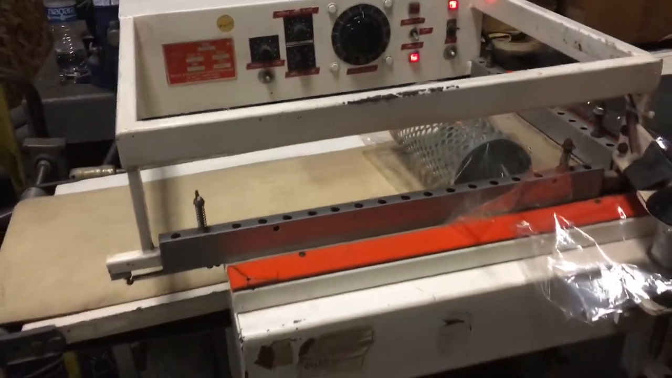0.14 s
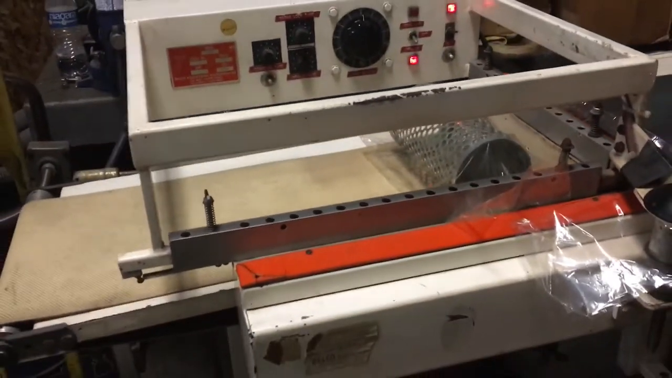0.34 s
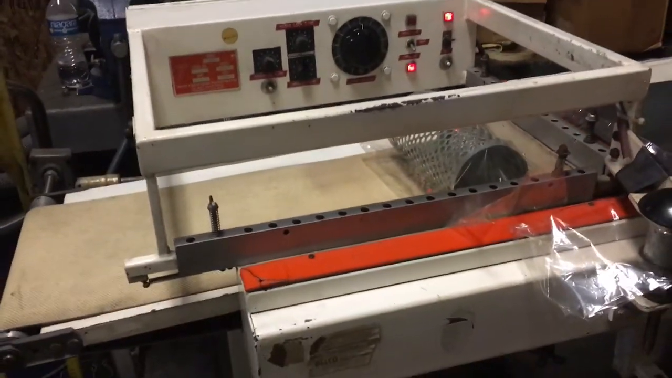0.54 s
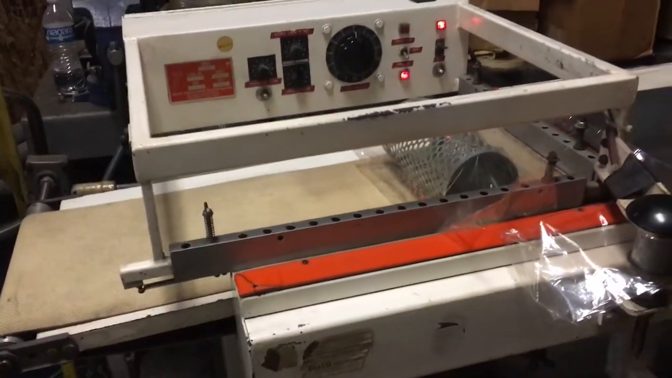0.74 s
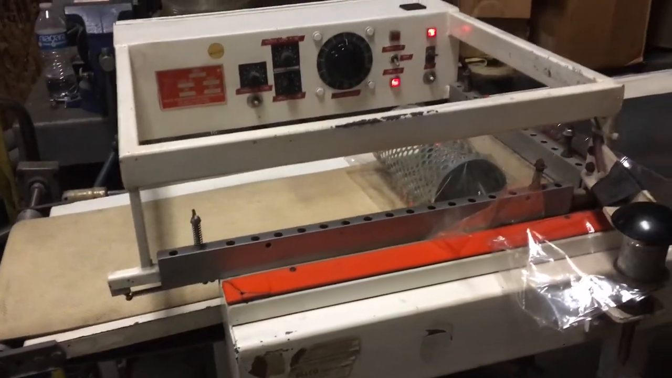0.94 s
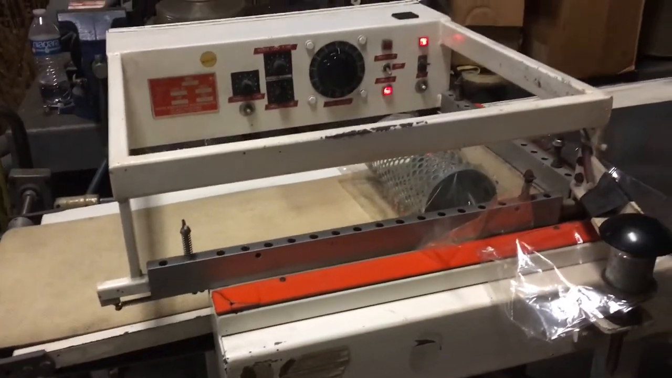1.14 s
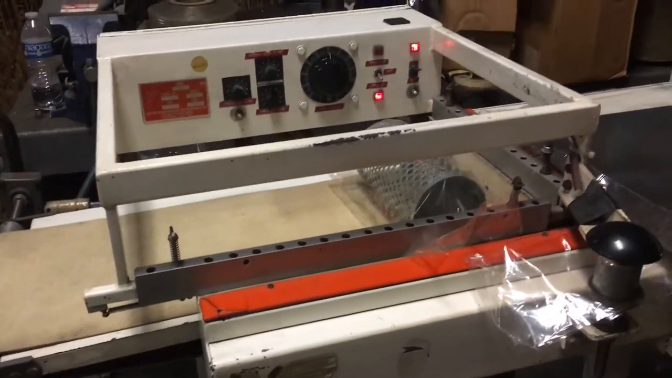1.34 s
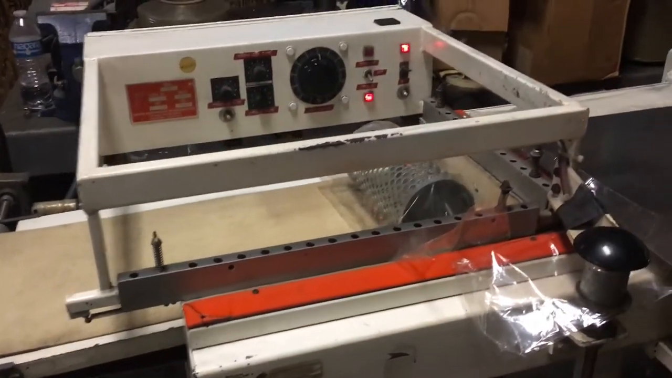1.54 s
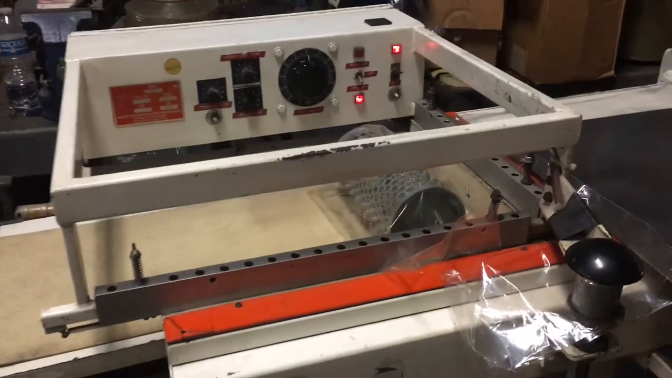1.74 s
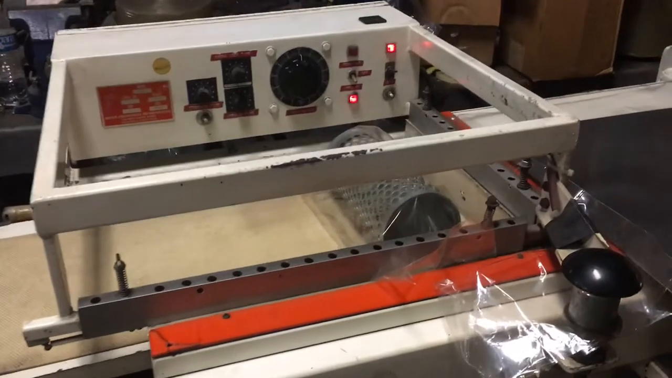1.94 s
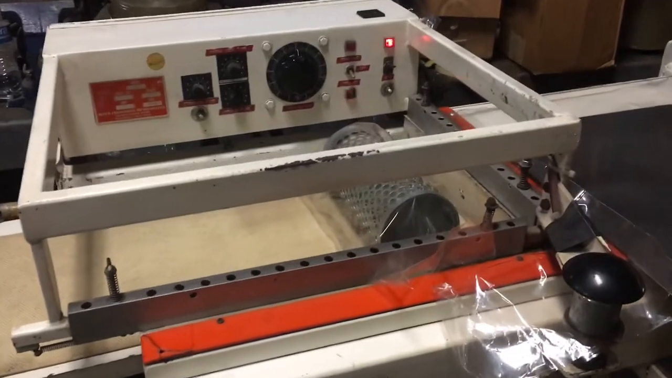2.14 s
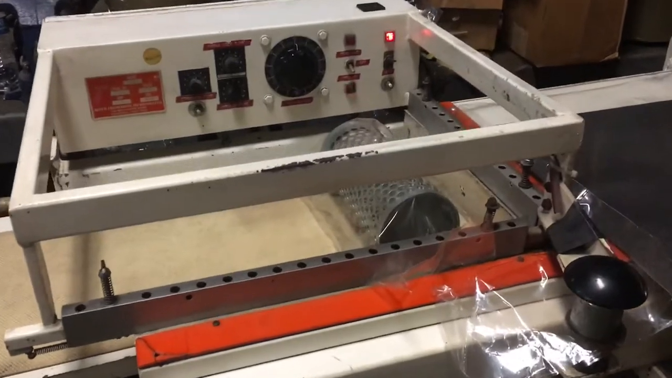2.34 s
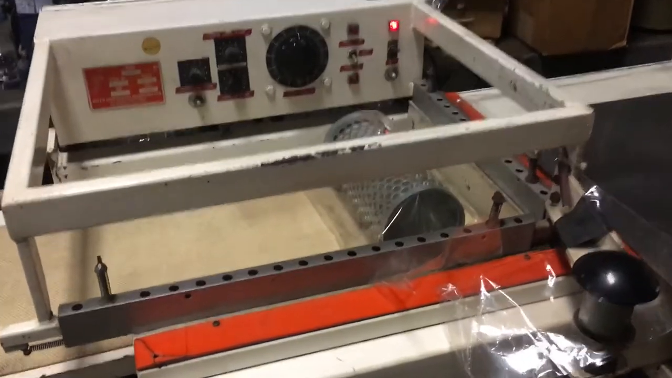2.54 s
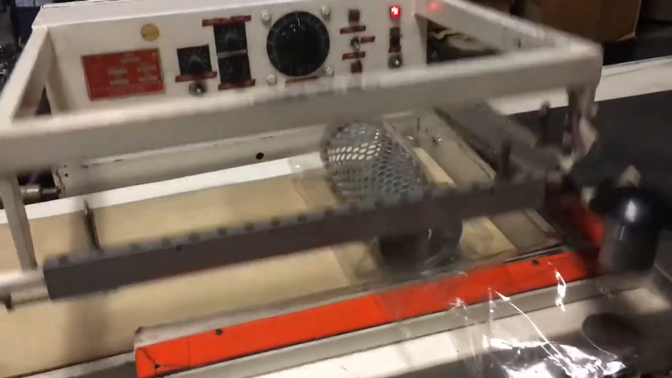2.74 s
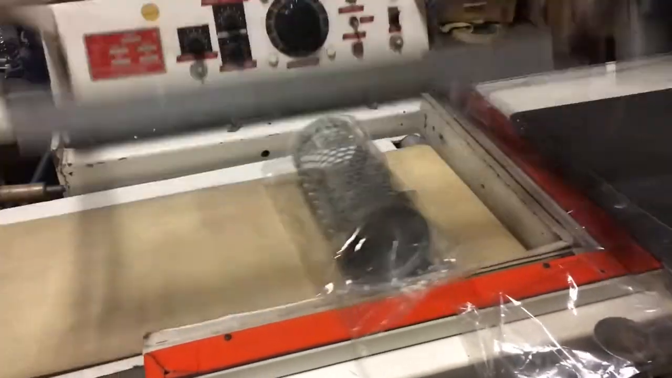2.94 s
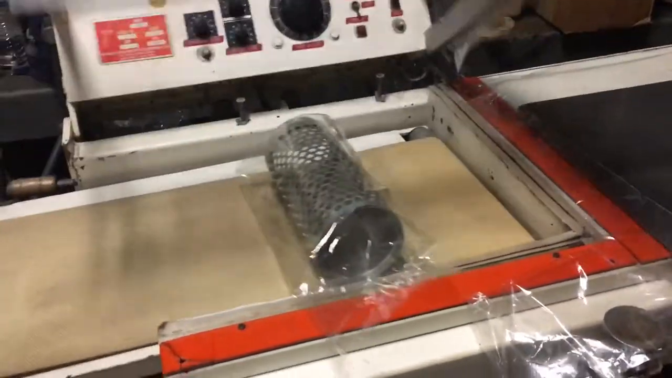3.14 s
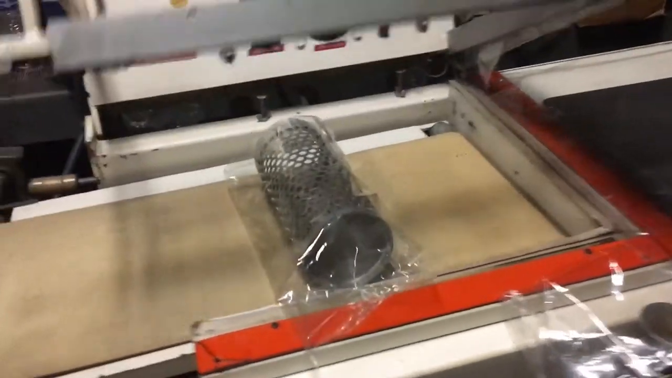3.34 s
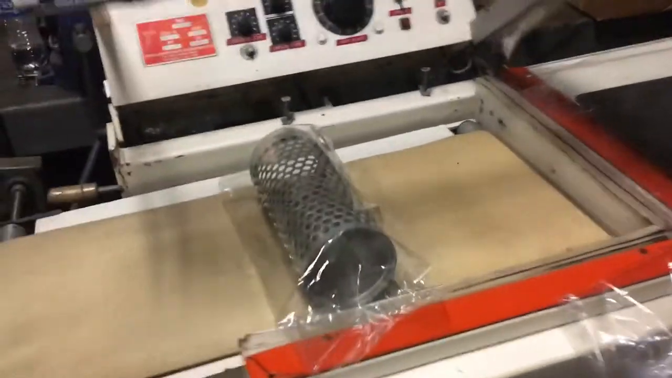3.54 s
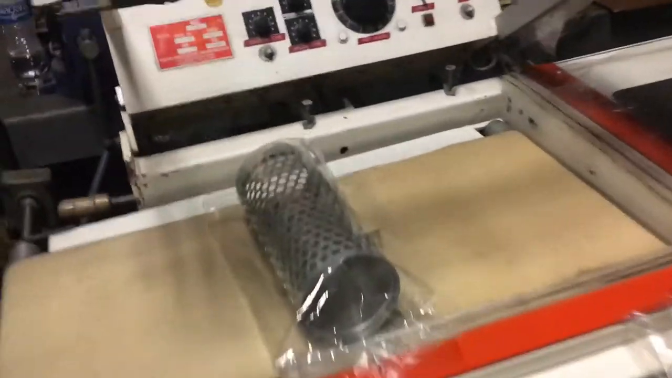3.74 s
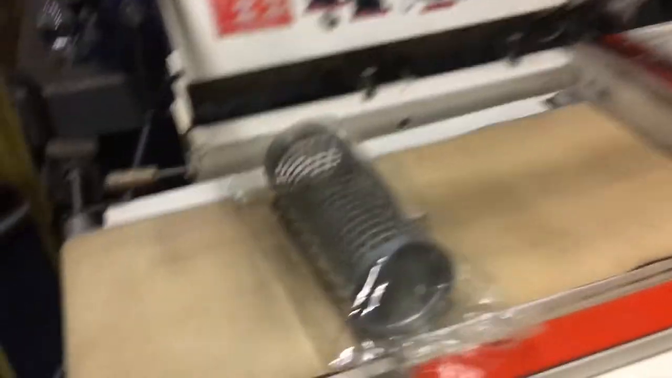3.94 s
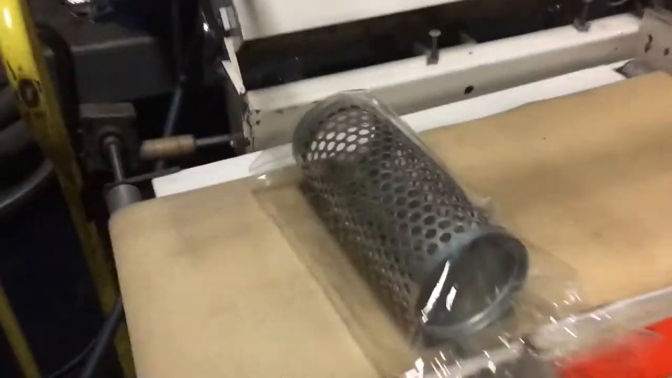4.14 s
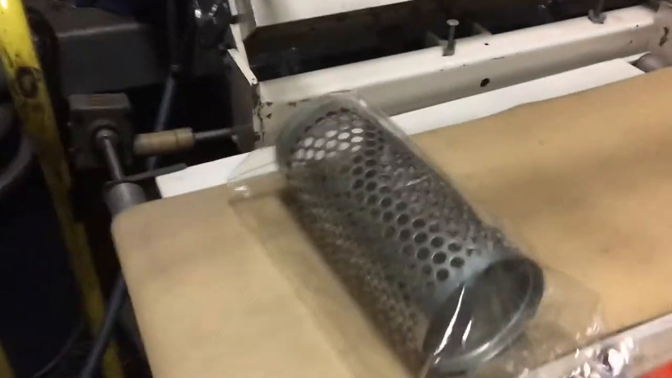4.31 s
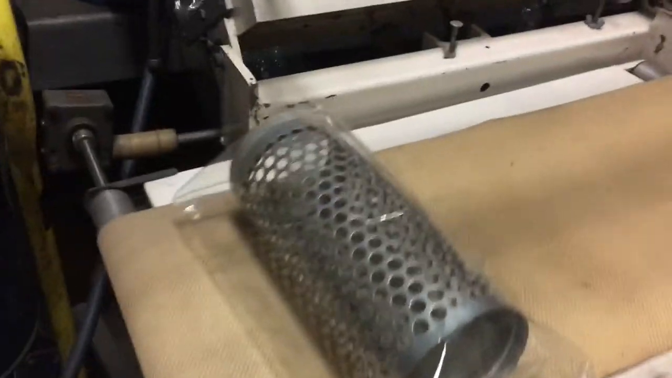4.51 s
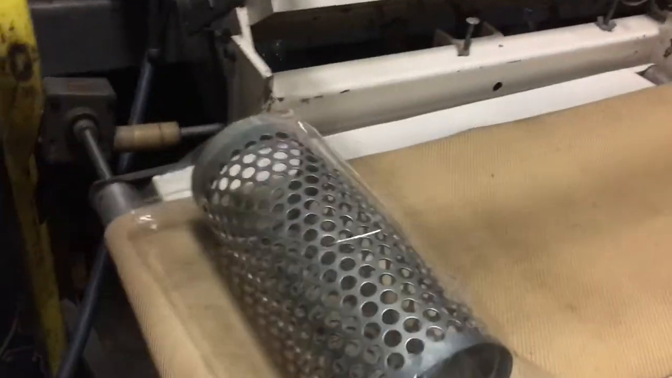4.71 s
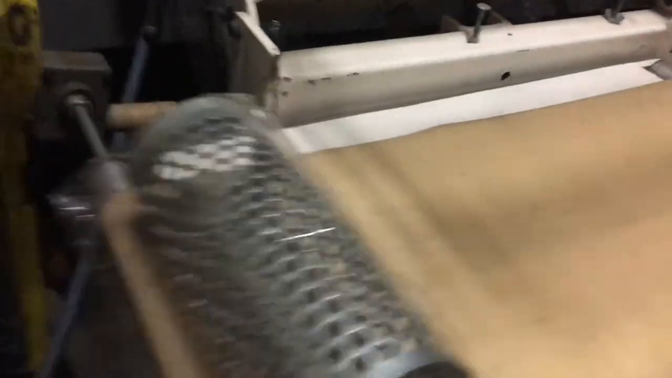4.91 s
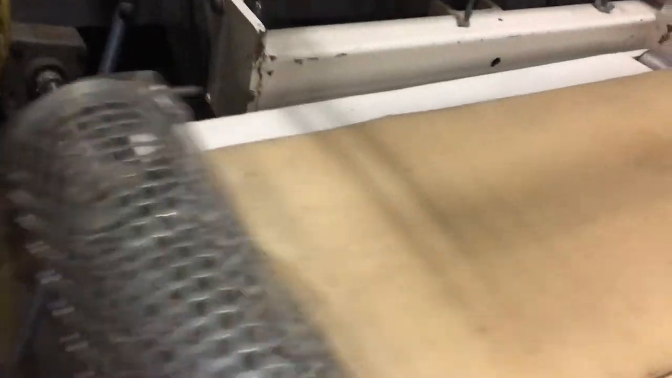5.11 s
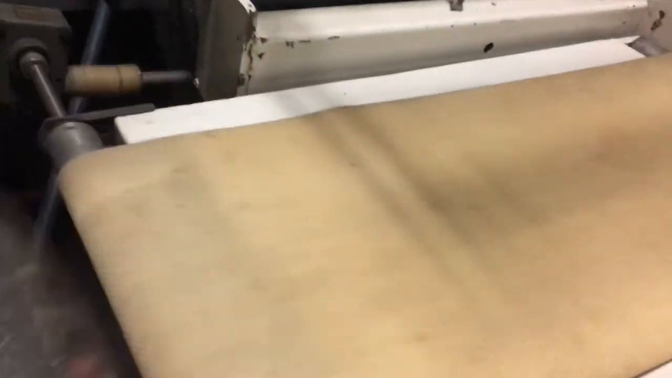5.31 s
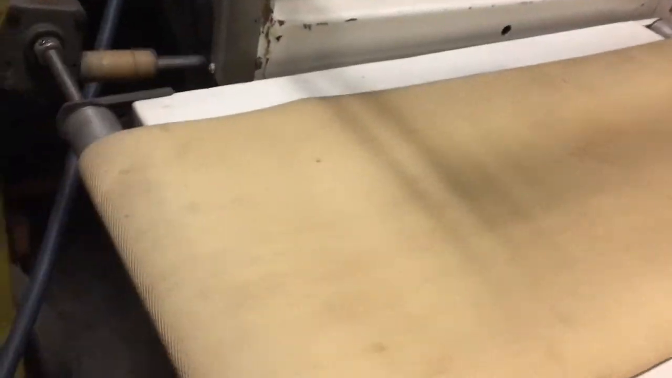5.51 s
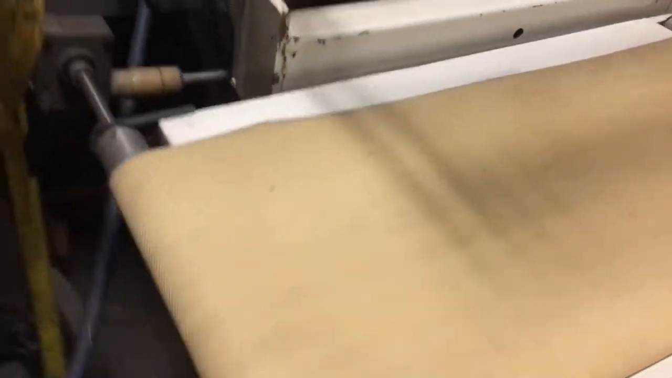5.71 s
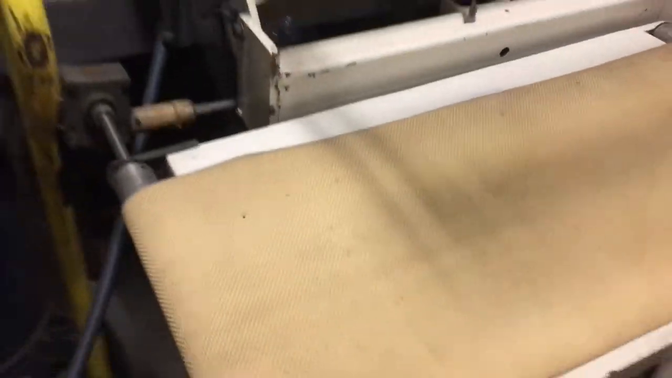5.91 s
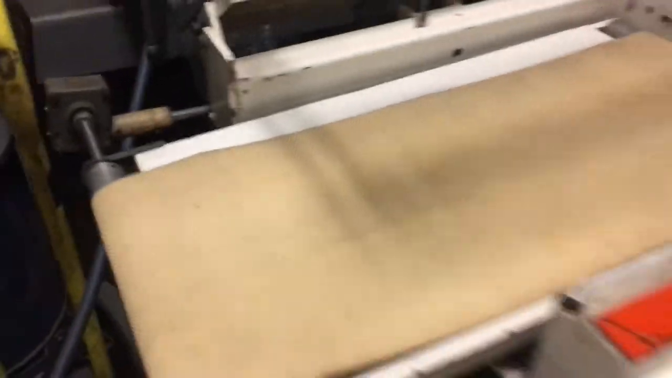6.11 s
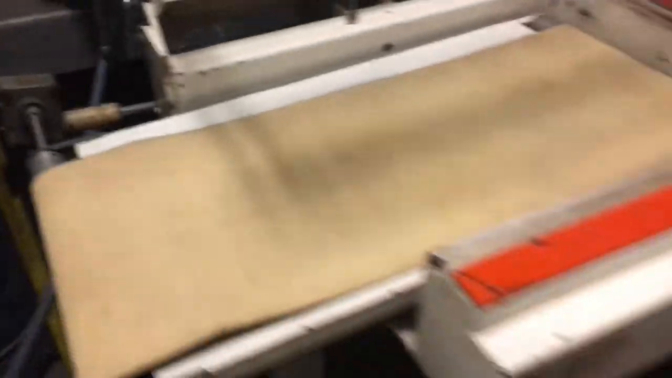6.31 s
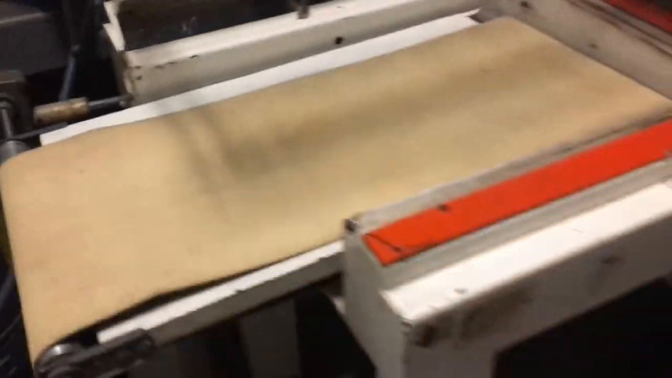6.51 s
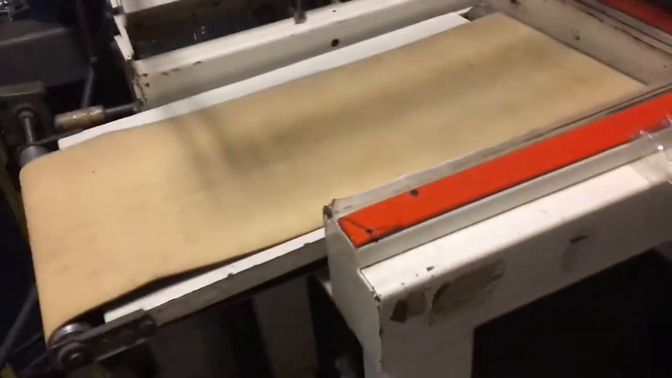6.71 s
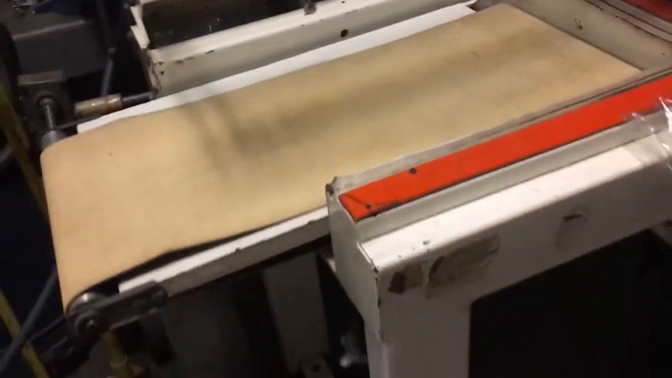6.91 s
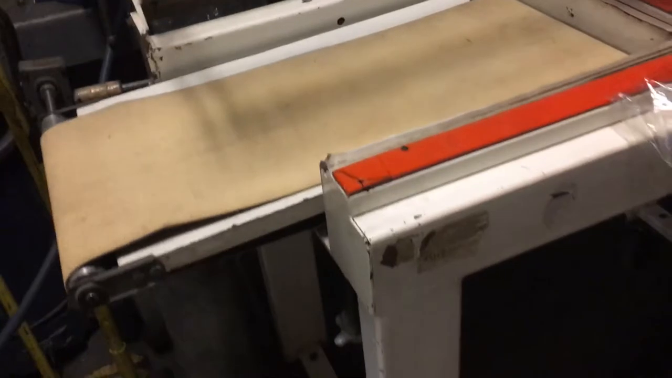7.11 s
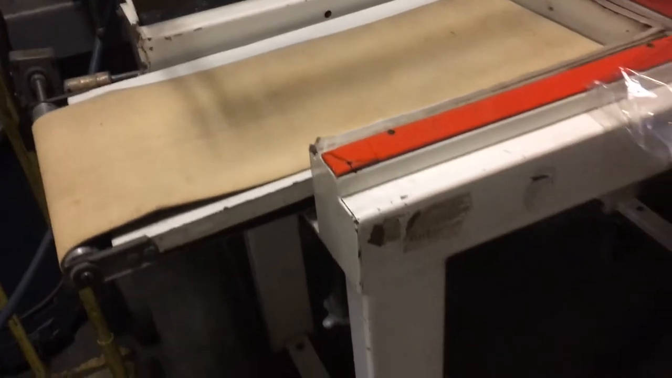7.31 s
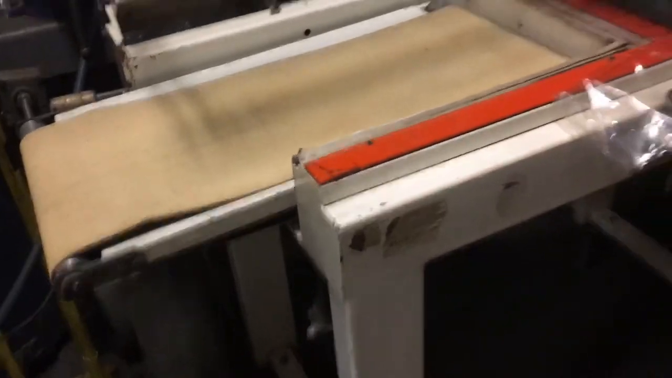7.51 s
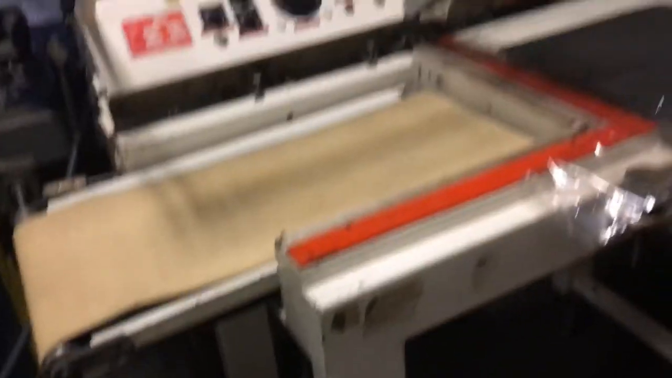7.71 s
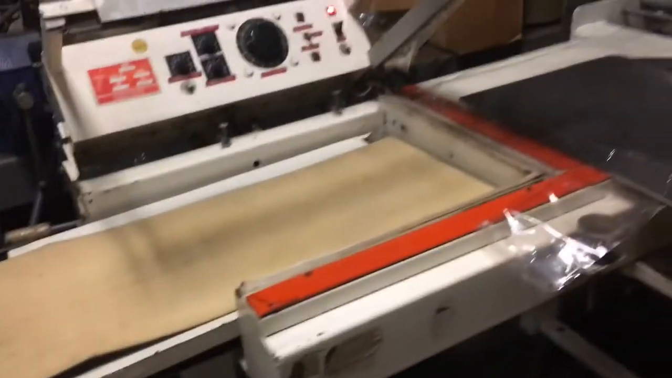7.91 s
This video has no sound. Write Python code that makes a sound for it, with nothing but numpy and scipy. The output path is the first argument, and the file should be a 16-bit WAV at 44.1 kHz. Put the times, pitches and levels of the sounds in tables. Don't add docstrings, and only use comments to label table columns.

```python
import sys
import numpy as np
from scipy import signal
from scipy.fft import rfft, irfft, next_fast_len
from scipy.io import wavfile
from scipy.ndimage import uniform_filter1d

SR = 44100
rng = np.random.default_rng(int(sys.argv[2]) if len(sys.argv) > 2 else 0)


def undo_db(level):
    steps = np.asarray(level, float) / 20
    return 10 ** steps


def wav_record(signal):
    frames = np.transpose(np.atleast_2d(signal))
    bounded = np.clip(frames, -1, 1)
    quanta = np.round(bounded * 32767).astype(np.int16)
    wavfile.write(sys.argv[1], SR, quanta)


N = 350809
T = np.arange(N) / SR

MOTOR_ON_S, MOTOR_OFF_S = 2.65, 5.72
IDLE_DB = -15


def noise(size=N):
    return rng.standard_normal(size)


def unit(x):
    return x / np.sqrt(np.mean(x ** 2))


def band(x, lo_hz, hi_hz):
    sos = signal.butter(2, [lo_hz, min(hi_hz, .49 * SR)], "band", fs=SR, output="sos")
    return signal.sosfilt(sos, x)


def colour(x, table):
    hz, db = np.transpose(table)
    size = next_fast_len(len(x))
    f = np.arange(size // 2 + 1) * SR / size + 1
    gain = undo_db(np.interp(np.log(f), np.log(hz), db))
    return irfft(rfft(x, size) * gain, size)[:len(x)]


def ring(x, hz, t60):
    r, w = np.exp(-np.log(1000) / (t60 * SR)), 2 * np.pi * hz / SR
    return signal.lfilter([np.sin(w)], [1, -2 * r * np.cos(w), r * r], x)


def walk(rate_hz):
    hold = int(SR / rate_hz)
    steps = np.repeat(noise(N // hold + 1), hold)
    return unit(uniform_filter1d(uniform_filter1d(steps, hold), hold)[:N])


def bumps(table):
    return sum(db * np.exp(-((T - s) / length) ** 2) for s, length, db in table)


def add(out, s, x):
    i = int(s * SR)
    out[i:i + len(x)] += x[:N - i]


def blows(table, modes, rise_share, peaked, scatter_db, thud_db, usual=(0, 0), spread=1.08):
    out = np.zeros(N)
    t = np.arange(SR * 2 // 5 if modes else SR // 8) / SR
    edges_hz = [(120, 1500), (1500, 7000), (7000, 17000)]
    for row in table:
        s, db, hz, tick_db, fade = (*row, *usual[len(row) - 3:])
        low_db = thud_db - 0.52 * (db + 23)
        rise = max(rise_share * fade, 1e-4)
        push = np.sin(np.pi / 2 * np.minimum(t / rise, 1)) ** 2
        push = push * np.exp(-np.maximum(t - rise, 0) / max(fade, 2e-4))
        parts = [band(noise(len(t)) * push, *e) for e in edges_hz]
        x = sum(undo_db(d) * p / np.abs(p).max() for p, d in zip(parts, (low_db, 0, tick_db)))
        peak = band(noise(len(t)) * push, hz / spread, hz * spread)
        x = (x + peaked * peak / np.abs(peak).max()) / max(peaked, 1)
        swell = np.cumsum(push) / push.sum()
        waver = np.cumsum(noise(len(t))) * .0025
        for f, d, t60 in modes:
            g, turn = rng.standard_normal(2)
            fall = undo_db(d + scatter_db * g - 60 * t / t60)
            x = x + swell * fall * np.sin(2 * np.pi * (f * t + turn + np.sign(g) * waver))
        add(out, s, undo_db(db) * x)
    return out


def shop():
    # f/Hz, level/dB per Hz
    plant = [(15, -33.5), (25, -15), (53, 5), (86, -4.5), (120, -4), (205, -9), (241, -10.5), (269, -14),
             (352, -15.5), (425, -22.5), (620, -17), (1390, -21.5), (1730, -21.5), (2970, -40),
             (15800, -48.5)]
    surge_db, rise_s = 13, .1
    after = T - 2.1
    surge = np.minimum(surge_db * after / rise_s, surge_db - 52 * (after - rise_s))
    surge = np.clip(surge, 0, None)
    buzz = np.sqrt(2) * undo_db(-59 + surge + .4 * walk(9.9)) * np.sin(2 * np.pi * 239.4 * T)
    buzz = buzz * np.clip((2.5 - T) / 0.032, 0, 1)
    return unit(colour(noise(), plant)) * undo_db(-51 + .5 * walk(8.9)) + buzz


def running_db():
    run_up_s, coast_db_per_s = .13, 60
    idle_end_s, idle_fade_db_per_s = 6.35, 60
    rise = 20 * np.log10(np.clip((T - MOTOR_ON_S) / run_up_s, 1e-4, 1))
    coast = np.maximum(-coast_db_per_s * np.maximum(T - MOTOR_OFF_S, 0), IDLE_DB)
    return rise + coast - idle_fade_db_per_s * np.maximum(T - idle_end_s, 0)


def load_db():
    # t/s, load/dB
    ride = [
        (2.7, 1.5),
        (3.1, 0),
        (3.5, -2.5),
        (4.0, 3),
        (4.4, 4.5),
        (4.7, 6),
        (5.2, 8),
        (5.45, 2.5),
        (5.7, -0.5),
    ]
    return np.interp(T, *np.transpose(ride))


def motor():
    # f/Hz, level/dB, throb depth [0-1], share of the load followed
    tones = [(120.4, -38.5, .55, .25), (57.2, -40, .3, .4), (240.4, -50, .6, -1.2)]
    # throb period/s, a crest at t/s
    throbs = [(.56, 4.78), (.5, 4.88), (.75, 3.66)]
    load = load_db()
    voices = []
    for (hz, db, depth, follows), (period, crest) in zip(tones, throbs):
        throb = 1 + depth * np.cos(2 * np.pi * (T - crest) / period)
        voices.append(undo_db(db + follows * load) * throb * np.sin(2 * np.pi * hz * T))
    hum, shaft, octave = voices
    stall = undo_db(bumps([(5.03, .09, -18)]))
    turn_s, crest_s, swell_db = 1.0, 3.97, 7
    swell = swell_db * (uniform_filter1d((T - crest_s) / turn_s % 1, SR // 8) - .6)
    riding = uniform_filter1d(1. * ((T > 3.2) & (T < 5.15)), SR // 10)
    shaft = shaft * undo_db(-6 * (1.5 - riding) + swell)
    return np.sqrt(2) * (hum * stall + shaft + octave) * undo_db(running_db() + 0.43 * walk(12))


def belt():
    # f/Hz, width/Hz, level/dB over the rattle
    frame = [(78, 12, 20), (199, 11, 3.5), (303, 11, 0.5), (416.7, 13, 11.5), (571, 60, 2.5), (943, 55, 6),
             (1550, 150, 5), (1897, 500, 7), (3320, 60, 1), (4050, 110, -3), (5527, 91, -13)]
    # f/Hz, level/dB per Hz
    belt_colour = [(15, -42), (25, -33.5), (116, -5.5), (165, -2), (235, -10), (316, -3.5), (654, -12.5),
                   (834, -18), (929, -11.5), (1010, -14.5), (1470, -16), (2520, -11), (6490, -24.5),
                   (9460, -32), (15800, -44.5)]
    # unloaded/dB, share of load followed, extra/dB when idling
    layers = [(-40, 0.53, -2), (-42, 0.99, -6), (-46.5, 0.66, -14), (-52, 0.1, -8)]
    # t/s, length/s, level/dB
    rubs = [
        (2.753, 0.078, 6),
        (4.325, 0.19, 4.5),
    ]
    # t/s, length/s, level/dB on the rattle
    lumps = [
        (3.07, 0.093, 5),
        (4.567, 0.063, 2.5),
        (4.847, 0.039, 2),
    ]

    sizes = undo_db(3.2 * np.minimum(rng.exponential(size=N), 4))
    knocks = (rng.random(N) < 900 / SR) * noise() * sizes
    smear = noise(400) * np.exp(-np.arange(400) / (0.00084 * SR))
    drive = unit(signal.fftconvolve(knocks, smear)[:N]) * .5 + noise()
    x = drive
    for hz, width, db in frame:
        flicker = undo_db(db + 2.8 * walk(11))
        x = x + flicker * unit(ring(drive, hz, 2.0 / width)) * np.sqrt(width / SR * np.pi)
    x = colour(x, belt_colour)

    # f/Hz, level/dB
    rumble = [(300, 2.0), (600, -4.0), (1500, -53.5)]
    rattle = [(240, -39), (600, 0.0), (1200, 6.0), (1500, -0.5), (2500, -5.5), (6000, -53.5)]
    sizzle = [(1000, -40), (2500, -6), (4000, 0), (4500, 0), (7000, -6), (14000, -40)]
    crinkle = [(3500, -40), (7000, -6), (11000, 0)]
    run, load = running_db(), load_db()
    idling = np.clip(run / IDLE_DB, 0, 1) * (T > MOTOR_OFF_S)
    rub, lump = bumps(rubs), bumps(lumps)
    out = np.zeros(N)
    for shape, extra, layer in zip((rumble, rattle, sizzle, crinkle), (lump, lump, 0, rub), layers):
        db, follows, idle_db = layer
        level = db + run + follows * load + idle_db * idling + extra + 0.8 * walk(8.3)
        out += unit(colour(x, shape)) * undo_db(level)
    return out


def crumple():
    # t/s, crackle/dB, length/s, fall meanwhile/dB per s
    bouts = [
        (5.72, -41, 0.23, 48),
        (6.141, -41, 0.32, 26),
        (6.51, -55, 0.17, -22),
    ]
    rise_s, end_db_per_s = .02, 170
    sizes = undo_db(2.5 * np.minimum(rng.exponential(size=(5, N)), 2))
    creases = (rng.random((5, N)) < 70 / SR) * noise((5, N)) * sizes
    snaps = noise((5, 200)) * np.exp(-np.arange(200) / (0.00089 * SR))
    x = signal.fftconvolve(creases, snaps, axes=1)[:, :N].sum(axis=0)
    x = colour(x, [(250, 1.5), (900, -4.5), (3000, -8.0), (6000, -15), (15000, -29)])
    level = np.zeros(N)
    for s, db, length, fall in bouts:
        after = T - s
        fading = db - fall * after.clip(0, length) - end_db_per_s * (after - length).clip(0)
        level += undo_db(fading) * np.clip(1 + after / rise_s, 0, 1)
    return unit(x) * level


def film():
    # t/s, peak/dB, strongest f/Hz
    snaps = [(5.943, -40.5, 1990), (5.9727, -38, 4700), (5.9996, -38, 5470), (6.0241, -41.5, 1650),
             (6.134, -45, 2350), (6.105, -47.5, 1750), (6.1807, -37, 3700), (6.312, -41, 1500),
             (6.244, -34, 7500), (6.263, -44, 3100), (6.2986, -37, 5290), (6.3255, -35.5, 6000),
             (6.3449, -36, 1706), (6.719, -38.5, 2260), (6.4039, -50, 4630), (6.425, -39, 1650),
             (6.454, -32.5, 1570), (6.4635, -51, 6500), (6.4975, -55, 2340), (6.511, -44, 3440),
             (6.535, -41.5, 1190), (6.577, -44, 2740), (6.6038, -39, 1550), (6.637, -49, 5740),
             (6.6452, -33.5, 2080), (6.6707, -29.5, 1960), (6.6908, -28, 3550), (6.8298, -49, 2270),
             (6.8487, -50, 1700), (6.9116, -44, 5330)]
    # t/s, peak/dB, strongest f/Hz
    late = [
        (7.311, -63, 4300),
        (7.3985, -55, 5080),
        (7.8351, -55, 7250),
        (7.8707, -59, 2540),
    ]
    # t/s, peak/dB, strongest f/Hz, tick/dB, fade/s
    folds = [
        (6.1465, -33, 3000, -16, 0.0036),
        (6.2175, -18.5, 2600, -9, 0.0042),
        (6.3655, -23, 1990, -30, 0.0024),
    ]
    small = blows([*snaps, *late], [], rise_share=0.47, peaked=0.79, scatter_db=0, thud_db=-8,
                  usual=(-21, .0028), spread=1.23)
    big = blows(folds, [], rise_share=0.22, peaked=1.52, scatter_db=0, thud_db=-0.5, spread=1.28)
    return small + big + crumple()


def switch():
    # t/s, peak/dB, strongest f/Hz, tick/dB, fade/s
    clicks = [
        (2.5022, -15.5, 2010, -9, .00025),
        (2.5076, -24.5, 2570, -5, 0.00046),
    ]
    return blows(clicks, [], rise_share=.3, peaked=.1, scatter_db=0, thud_db=-8, spread=1.5)


def contactor():
    # t/s, peak/dB, strongest f/Hz, tick/dB, fade/s
    bounces = [
        (2.0805, -29.5, 1690, 8, 0.0028),
        (2.088, -21.5, 5140, 7, 0.012),
        (2.0945, -15, 6560, -6, 0.0038),
        (2.103, -27.5, 1680, -4, 0.017),
        (7.053, -42, 4070, -4, 0.024),
    ]
    # f/Hz, level/dB under the blow, t60/s
    cabinet = [(189.4, -10.5, 0.063), (244, -21, 0.19), (470, -16.5, 0.073), (567, -32.5, 0.3),
               (1680, -36, 0.22), (2180, -32, 0.3)]
    return blows(bounces, cabinet, rise_share=0.88, peaked=0.85, scatter_db=4.0, thud_db=-13.5)


def latch():
    # t/s, peak/dB, strongest f/Hz, tick/dB, fade/s
    knocks = [
        (2.513, -42, 5080, -2.5, .02),
        (2.551, -24, 6350, -8, .003),
        (2.558, -21.5, 1820, -17.5, 0.015),
        (2.572, -25.5, 4280, 3.5, .0074),
    ]
    # f/Hz, level/dB under the blow, t60/s
    linkage = [(428, -19, .15), (575, -17.5, 0.17), (950, -34.5, 0.65), (1700, -15.5, 0.16),
               (1960, -20, .2), (3200, -23.5, 0.15), (3410, -20.5, 0.34), (4440, -16, 0.21),
               (5900, -25.5, 0.15)]
    # t/s, peak/dB, strongest f/Hz
    pings = [
        (2.534, -27, 11200),
        (2.642, -37, 12500),
        (2.758, -36, 10600),
        (3.477, -30.5, 9250),
    ]
    released = blows(knocks, linkage, rise_share=0.19, peaked=0.29, scatter_db=1.5, thud_db=-5.5)
    return released + blows(pings, [], rise_share=.4, peaked=4, scatter_db=0, thud_db=-35,
                            usual=(-3, .0055), spread=1.04)


def arm():
    # t/s, peak/dB, strongest f/Hz, tick/dB, fade/s
    clangs = [(3.0415, -25, 4120, 4, 0.0074), (3.05, -21.5, 3560, -10.5, 0.014),
              (3.072, -25, 3750, -10.5, 0.019), (3.1, -16, 5900, -6, 0.0064),
              (3.1065, -8.5, 11800, -3.5, 0.0027), (3.114, -17, 11750, -4.5, 0.0086),
              (3.131, -13, 4000, 2, 0.0088), (3.138, -9.5, 4130, 0.5, 0.0089),
              (3.16, -18.5, 4110, -10, 0.022), (3.447, -33.5, 4120, -17, 0.014),
              (3.465, -31, 4240, -15, 0.022), (3.49, -28, 11460, -12.5, 0.027),
              (3.512, -21, 3250, -2, 0.0056), (3.525, -14, 4050, -7, 0.0082),
              (3.547, -21.5, 4500, -2, 0.016), (3.752, -29, 4050, -26, 0.016),
              (3.905, -33, 4300, -8, 0.0073)]
    # f/Hz, level/dB under the blow, t60/s
    steel = [(1167, -19, .16), (2251, -22, 0.45), (2395, -23, 0.3), (3110, -29, 0.8), (3226, -25, 0.54),
             (3682, -23, 0.25), (3700, -30, 0.4), (3960, -28, 0.22), (4220, -24.5, .25), (4300, -21.5, .25),
             (4230, -23.5, .2), (4683, -28, 0.1), (6270, -24.5, 0.25), (6700, -25.5, 0.26), (8500, -28, .1),
             (10600, -34, 0.084), (11500, -19, 0.11), (12500, -34.5, .1)]
    return blows(clangs, steel, rise_share=0.61, peaked=0.93, scatter_db=4.5, thud_db=-7)


def chatter():
    # t/s, peak/dB, strongest f/Hz, tick/dB
    grazes = [
        (5.118, -20.5, 3700, -19),
        (5.195, -28.5, 3670, -15),
        (5.366, -39, 5465, -20),
        (5.4626, -22.5, 5470, -1.5),
        (5.817, -34.5, 5350, -4),
        (5.875, -46, 5450, -3),
    ]
    start_s, gap_s = 4.7245, .0525
    rows = [(start_s + k * gap_s, -36.5 + k * 2.5, 5150, -14) for k in range(7)]
    return blows([*rows, *grazes], [], rise_share=0.21, peaked=1.08, scatter_db=0, thud_db=-28,
                 usual=(-14, .008), spread=1.103)


def parcel():
    # t/s, peak/dB, strongest f/Hz, tick/dB
    tumbles = [(4.459, -32.5, 1210, -18), (4.501, -35, 1600, -19), (4.540, -28.5, 1170, -25),
               (4.585, -33, 1820, -20), (4.609, -30.5, 1880, -20), (4.715, -29.5, 920, -17),
               (4.867, -26, 1920, -24), (5.037, -22.5, 1410, -4), (5.078, -26.5, 1600, -23),
               (5.124, -22.5, 970, -23), (5.261, -16, 770, -8), (5.283, -13, 880, -10),
               (5.321, -26, 2275, 3), (5.341, -20, 2275, -14), (5.556, -24.5, 850, -18),
               (5.580, -23, 750, -20), (5.643, -21, 1210, -8.5), (5.671, -27, 2105, -12),
               (5.705, -39, 2640, -15), (5.852, -35, 1130, -17)]
    # f/Hz, level/dB under the blow, t60/s
    mesh = [(58, -14.5, 0.4), (174.7, -46, 0.053), (290, -14, 0.11), (407.4, -13, 0.2), (565, -24, 0.51),
            (855, -21, 0.048)]
    return chatter() + blows(tumbles, mesh, rise_share=0.54, peaked=0.41, scatter_db=3.0, thud_db=-3,
                             usual=(-19, .013), spread=1.115)


def room(x):
    # f/Hz, t60/s
    decay = [(200, 0.35), (1000, 0.65), (4000, 0.47), (7000, 0.53), (10000, 0.21), (15000, 0.083)]
    hz, t60 = np.transpose(decay)
    t = np.arange(SR) / SR
    tail = np.zeros(SR)
    for f in 125 * 2. ** np.arange(0, 7.1, .5):
        fall = undo_db(-60 * t / np.interp(np.log(f), np.log(hz), t60))
        tail += np.sqrt(f) * unit(band(noise(SR), f / 1.19, f * 1.19)) * fall
    tail *= np.minimum(t / 0.0011, 1)
    return signal.fftconvolve(x, tail / np.sqrt(np.sum(tail ** 2)))[:N]


def scene():
    click, clack, release = switch(), contactor(), latch()
    clang, tumble, crackle = arm(), parcel(), film()
    sends = undo_db(-6.0) * clack + undo_db(-7.0) * release + undo_db(-10) * clang
    sends = sends + undo_db(-8.5) * (tumble + crackle)
    echo = room(sends + click / 10)
    near = clack + click + release + clang + tumble + crackle
    return (near + echo + motor() + belt() + shop())[None]


def roll_off(x):
    return signal.sosfilt(signal.butter(12, 16530, fs=SR, output="sos"), x)


def record(dry):
    low_pass = signal.ellip(10, .2, 60, 15950, fs=SR, output="sos")
    return roll_off(signal.sosfilt(low_pass, dry))


dry = scene()
out = record(dry)
wav_record(out)
```